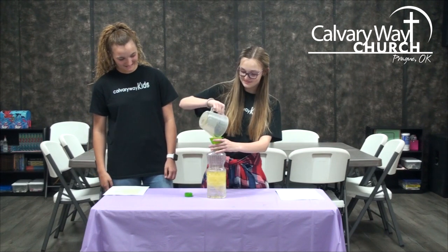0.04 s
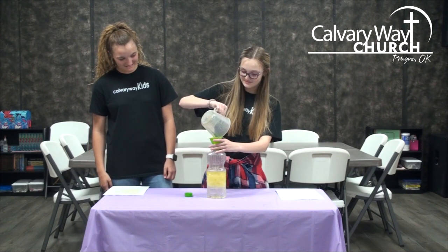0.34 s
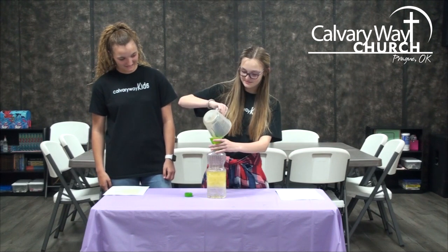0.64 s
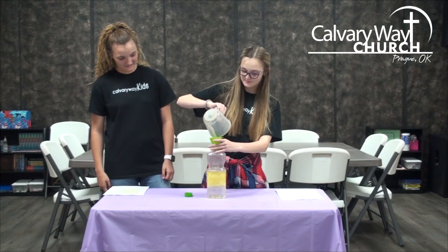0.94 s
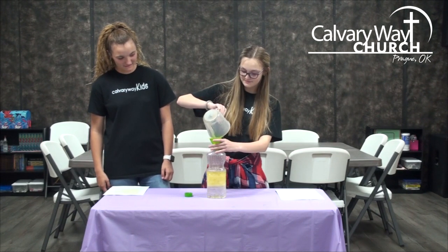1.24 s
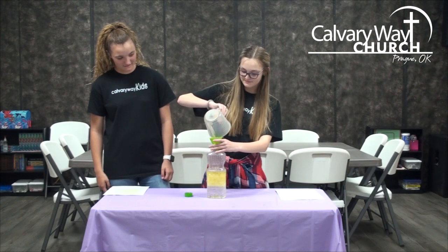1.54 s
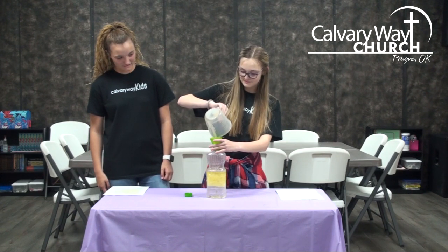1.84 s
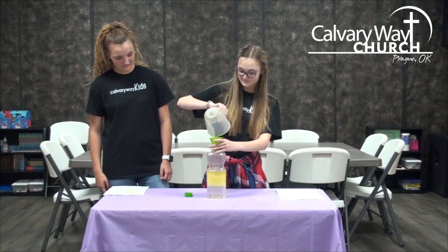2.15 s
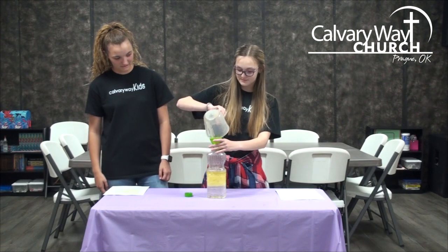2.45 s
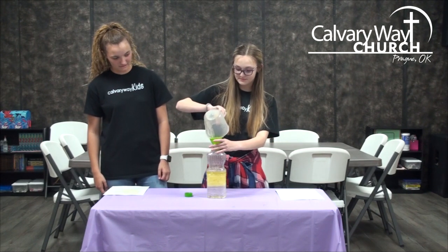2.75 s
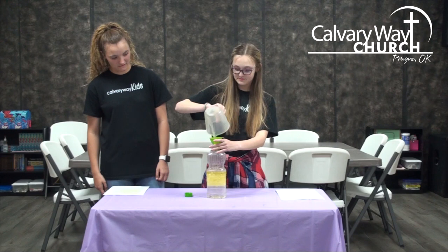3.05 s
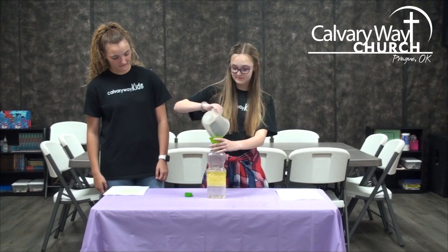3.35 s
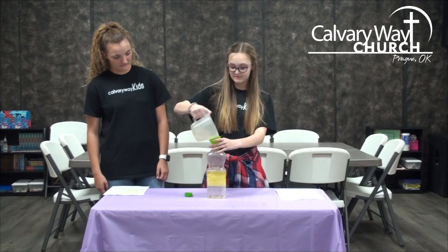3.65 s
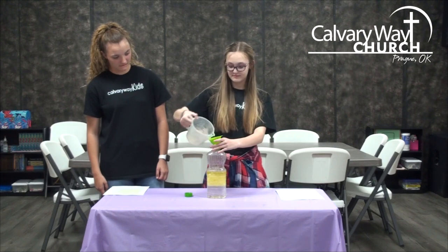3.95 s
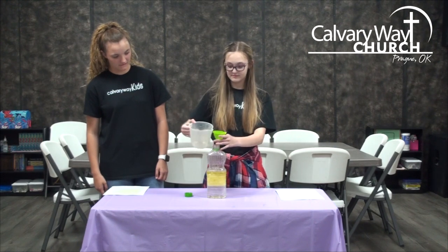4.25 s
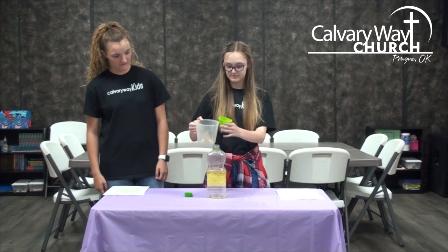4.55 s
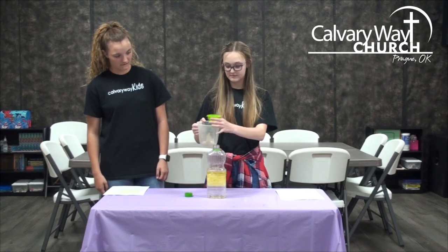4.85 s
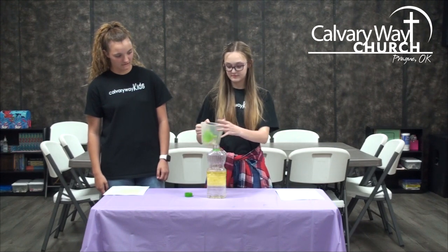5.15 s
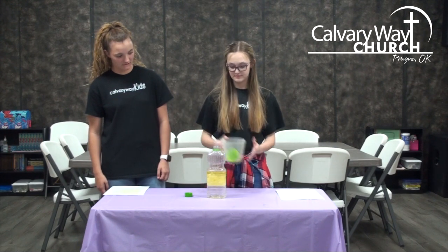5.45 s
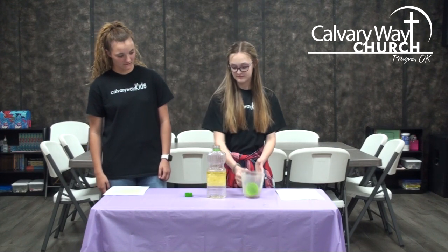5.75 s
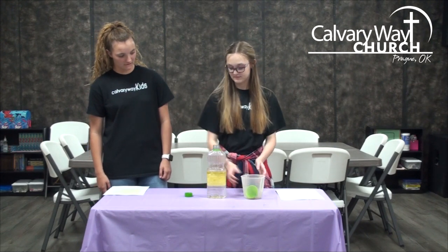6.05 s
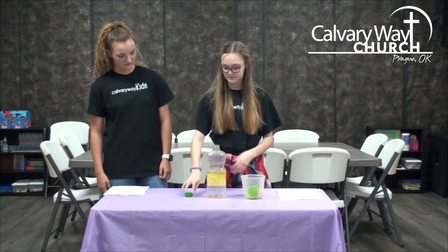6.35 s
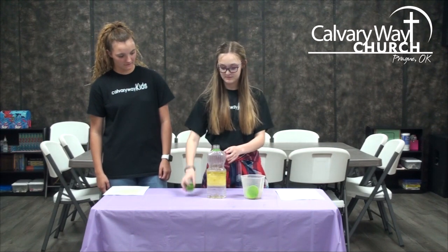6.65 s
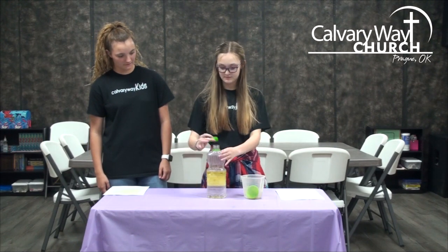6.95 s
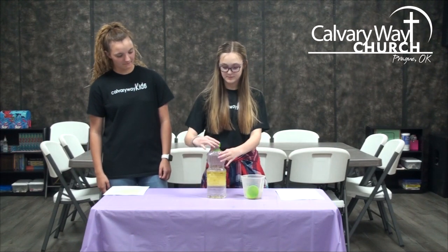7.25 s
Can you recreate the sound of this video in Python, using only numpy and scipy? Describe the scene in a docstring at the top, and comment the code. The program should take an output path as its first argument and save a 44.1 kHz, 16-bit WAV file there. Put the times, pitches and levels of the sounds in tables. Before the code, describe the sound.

Ventilation hisses steadily over a low rumble in a lively room that echoes each contact, with the action slightly to the left. From 0.2 to 1.2 seconds, five faint drips plop into a funnel. Between 1.3 and 3.3 seconds, a plastic jug knocks on the funnel nine times, about four a second, hollow clacks that grow louder and sharper with a soft table thud beneath. Light plastic bumps follow until 4.4 seconds. From 4.2 seconds a faint low drone, like a motor outside, climbs in pitch to the end. At 5.2 to 5.5 seconds the funnel bounces and clatters into the jug, its rim ringing briefly. Near 5.9 seconds the jug lands on the table with a dull, boomy thump and rocks briefly. Around 6.6 seconds fingers brush the plastic table cover amid small ticks, and at 7.2 seconds the cap clicks lightly onto the bottle.

```python
"""Emptying a plastic jug through a funnel

A jug drips into a funnel on a bottle and is knocked on it nine times to shake out the rest.
The funnel is lifted out and clatters into the jug, the jug thumps down on the table, and the cap
is fetched and put on the bottle. Most blows are a short click plus a few fading tones, and a lively
room echoes each one. Ventilation hisses throughout; a low drone climbs, like a motor outside."""
import sys
import numpy as np
from scipy import signal
from scipy.fft import rfft, irfft, next_fast_len
from scipy.io import wavfile
from scipy.ndimage import uniform_filter1d, map_coordinates

SR = 44100
rng = np.random.default_rng(int(sys.argv[2]) if len(sys.argv) > 2 else 0)


def unload_wav(signal):
    """Save mono or channel-first audio to the path in sys.argv[1] as 16-bit WAV at rate SR, clipped to [-1, 1]."""
    wavfile.write(
        sys.argv[1],
        SR,
        np.round(np.clip(np.atleast_2d(signal).T, -1, 1) * 32767).astype(np.int16),
    )


N = 325936
LENGTH = 27000  # samples in one blow with its tail

# A spectrum gives the relative strength of each frequency. A fade is the time to die away by 60 dB.
# spectrum of the ventilation: f/Hz, level/dB
AIR_SPECTRUM = [(15, -20), (25, 1), (40, -29), (55, 4), (80, -3.5), (148, -5.5), (179, -11.5), (570, -10),
                (857, -8), (1780, -14.5), (15800, -32.5)]
# how alike the ventilation is left and right: f/Hz, likeness (1 = the same)
AIR_LIKENESS = [(60, 1), (140, 0.85), (300, 0.044), (1000, 0.11), (5000, 0.063), (10000, 0.53)]
# drips into the funnel: t/s, level/dB, f/Hz
DRIPS = [(0.179, -35, 870), (0.425, -36, 910), (0.675, -34, 872), (0.807, -39, 993), (1.179, -35, 854)]
# knocks of the jug on the funnel: t/s, level/dB
KNOCKS = [(1.313, -15), (1.612, -13), (1.859, -11), (2.112, -9.5), (2.342, -8), (2.556, -8), (2.81, -3.5),
          (3.026, -10.5), (3.257, -4)]
# spectrum of the jug's shell: f/Hz, level/dB
SHELL_SPECTRUM = [(60, -49), (250, -20), (430, 3.5), (550, -6), (700, 10), (850, -4.5), (1050, 3.5),
                  (1400, -4), (1750, 4), (2250, -1.5), (2700, -4.5), (5000, -16.5), (10000, -29.5),
                  (16000, -73)]
# ringing tones of the shell: f/Hz, level/dB, fade/s
SHELL_TONES = [(473, -18, 0.3), (691.6, -6.5, 0.089), (1707, -16, 0.085), (1830, -12, 0.065),
               (2188, -4, 0.079), (2131, -8, 0.028)]
# thud of the table under the bottle: f/Hz, level/dB
THUD_SPECTRUM = [(30, -67), (62, -5), (85, -18), (110, -9.5), (150, 5.5), (210, 1), (300, -2.5), (450, -33),
                 (700, 2.5), (3000, -97)]
# crack of the jug's lip: f/Hz, level/dB
CRACK_SPECTRUM = [(300, -57), (1800, -21), (3000, -8), (4400, 6), (6500, 2), (10500, -7.5), (13000, -14.5),
                  (16000, -33.5)]
# snap of the funnel in the bottle's neck: f/Hz, level/dB
SNAP_SPECTRUM = [(1000, -37), (4000, 0), (7000, -14.5), (10800, 1.5), (13000, -48), (16000, -32),
                 (18000, -45)]
# light bumps of jug, funnel and cap: t/s, note level/dB, f/Hz, tick level/dB
BUMPS = [(3.324, -12, 636, -41), (3.365, -21, 690, -38.5), (3.638, -26.5, 444, -40.5),
         (3.738, -26.5, 885, -45), (3.835, -21, 694, -40.5), (3.892, -38, 680, -47.5),
         (4.021, -28, 944, -53), (4.211, -23.5, 930, -43.5), (4.352, -29.5, 855, -52),
         (6.486, -30, 643, -52), (6.722, -30.5, 1800, -45.5), (7.2, -27, 453, -39.5),
         (7.213, -52, 483, -37.5)]
# a bump's hollow note: multiple of its pitch, level/dB
NOTE_SPECTRUM = [(.2, -32), (.6, -16), (.85, -22), (1, 7.5), (1.15, -3), (1.6, -11.5), (5, -46.5)]
# a bump's tick: f/Hz, level/dB
TICK_SPECTRUM = [(40, -31), (200, 8.5), (500, 9), (1000, 8.5), (2000, 5.5), (3500, -6.5), (6000, -8),
                 (10000, -14.5), (15000, -36)]
# climb of the drone's lower tone: t/s, f/Hz
DRONE_PITCH = [(4.2, 49.5), (5.2, 54.8), (6.3, 58), (7.39, 60)]
# bounces of the funnel in the jug: t/s, level/dB, click level/dB
BOUNCES = [(5.1655, -15, -29), (5.234, -6.5, -23), (5.2455, -9, -27.5), (5.2869, -12, -24),
           (5.4256, -15.5, -27), (5.458, -22, -32), (5.4993, -28, -43), (5.5273, -16.5, -33)]
# spectrum of the hollow jug: f/Hz, level/dB
HOLLOW_SPECTRUM = [(60, -48), (200, -28.5), (330, -19.5), (450, -6), (640, 1.5), (800, -8), (1100, -18),
                   (1400, -12), (1900, -19), (2300, -11.5), (3300, -30.5), (8000, -57.5)]
# ringing tones of the hollow jug: f/Hz, level/dB, fade/s
HOLLOW_TONES = [(447, -14, 0.96), (526, -19, 0.3), (657, -28, 0.13)]
# ringing tones of the funnel's rim: f/Hz, level/dB, fade/s
RIM_TONES = [(1553, -0.5, 0.19), (1575, -2.5, 0.54), (1605, -6, 0.14), (1683, -8, 0.022), (1860, -19, 0.14),
             (2753, -18, 0.15)]
# click of the funnel's edge: f/Hz, level/dB
CLICK_SPECTRUM = [(900, -17.5), (2300, 12), (3700, -0.5), (5000, -1.5), (6500, -6.5), (8300, -4.5),
                  (11000, -11.5), (13000, -20), (16000, -27)]
# the jug lands on the table and rocks: t/s, level/dB
LANDINGS = [(5.931, -15.5), (5.950, -25), (5.982, -25.5), (6.006, -29.5), (6.058, -34.5)]
# boom of the table top: f/Hz, level/dB
TABLE_SPECTRUM = [(30, -23), (85, -21), (125, 1.5), (150, -0.5), (185, -7.5), (245, 6.5), (290, 4),
                  (330, -25), (600, -24.5), (2000, -80)]
# ringing tones of the table top: f/Hz, level/dB, fade/s
TABLE_TONES = [(143, -32, 0.19), (251, -21, 0.24), (285.2, -8.5, 0.22)]
# clack of the jug's base: f/Hz, level/dB
BASE_SPECTRUM = [(30, -40), (150, -24), (380, -3.5), (580, 3), (900, -12), (1500, -13), (3000, -23.5),
                 (6000, -29), (10000, -38), (15000, -57)]
# rub of fingers on the table cover: f/Hz, level/dB
COVER_SPECTRUM = [(1500, -20), (3200, -1), (8000, -5), (12000, -10), (16000, -13)]
# how long the room echoes: f/Hz, fade/s
ECHO_FADE = [(120, 0.58), (300, 0.89), (700, 0.57), (2000, 0.58), (5000, 0.61), (9000, 0.43), (15000, 0.24)]
# how alike the echo is left and right: f/Hz, likeness
ECHO_LIKENESS = [(60, 1), (250, 0.92), (600, 0.87), (1100, 0.72), (2200, 0.72), (5000, 0.83), (15000, 0.52)]
# direct sound compared with the echo: f/Hz, level/dB
DIRECT_OVER_ECHO = [(150, -37), (600, -7), (1200, -3.5), (2000, -2), (4000, -6.5), (10000, -2.5),
                    (15000, 9)]
# left side compared with the right: f/Hz, level/dB
LEFT_OVER_RIGHT = [(60, -2), (200, 1.5), (500, 2), (1200, 2), (2400, 2), (4400, 1.5), (8000, 1),
                   (15000, -1)]
# how far the left side's wave is ahead: f/Hz, phase/rad
LEFT_LEAD = [(50, 0.015), (150, 0.14), (600, 0.44), (1200, -0.22), (2200, -0.28), (4500, 0.24),
             (9000, 0.16)]


def amp(db):
    """Turn decibels into a factor to multiply by."""
    return 10 ** (np.asarray(db) / 20)


def unit(x):
    """Scale to an average power of 1."""
    return x / np.sqrt(np.mean(x ** 2) + 1e-20)


def blow_sized(x):
    """Scale to the energy of 50 ms at power 1."""
    return x * np.sqrt(SR / 20 / (np.sum(x ** 2) + 1e-20))


def look_up(table, hz):
    """Read between a table's rows, with frequency on a log scale."""
    freqs, values = np.transpose(table)
    return np.interp(np.log(hz + 1), np.log(freqs + 1), values)


def wobble(rate):
    """A smooth curve through `rate` random values a second."""
    return map_coordinates(rng.standard_normal(int(N * rate / SR) + 4), [np.arange(N) * rate / SR])


def filtered(x, response):
    """Multiply each frequency in x by response(hz)."""
    n = x.shape[-1]
    padded = next_fast_len(n + SR // 10)
    return irfft(rfft(x, padded) * response(np.fft.rfftfreq(padded, 1 / SR)), padded)[..., :n]


def flattened(x):
    """Even out the broad humps in the spectrum of a noise burst."""
    power = np.abs(uniform_filter1d(np.abs(rfft(x)) ** 2, size=64)) + 1e-20
    return filtered(x, lambda hz: np.interp(hz, np.fft.rfftfreq(len(x), 1 / SR), power ** -.5))


def pulse(spectrum):
    """A click with this spectrum that starts at once and dies away."""
    gains = amp(look_up(spectrum, np.fft.rfftfreq(LENGTH, 1 / SR)))
    cepstrum = irfft(np.log(gains))
    cepstrum[1:LENGTH // 2] *= 2  # folding onto the first half packs the energy at the start
    cepstrum[LENGTH // 2 + 1:] = 0
    return blow_sized(irfft(np.exp(rfft(cepstrum))))


def ring(tones, vary_db=0):
    """Tones that swell within a cycle or two, then fade; vary_db scatters their levels."""
    out, t = np.zeros(LENGTH), np.arange(LENGTH) / SR
    for hz, db, fade_s in tones:
        envelope = (1 - np.exp(-hz * t)) * np.exp(-np.log(1000) * t / fade_s)
        out += amp(db + vary_db * rng.normal()) * blow_sized(np.sin(2 * np.pi * hz * t) * envelope)
    return out


def chatter(x, width_s):
    """Plastic edges catch and slip: the blow is smeared in time but keeps its tone."""
    age = np.arange(LENGTH) / SR / width_s
    grip = age ** 2 * np.exp(-age ** 2 / 2)
    slips = rfft(rng.standard_normal(LENGTH) * grip)
    evened = slips / (np.abs(slips) + np.mean(np.abs(slips)) / 10)
    contact = irfft(evened) * np.sqrt(grip)
    return signal.fftconvolve(x, contact / np.linalg.norm(contact))[:LENGTH]


def spread(pair, likeness):
    """Blend two unrelated noises so that they seem to come from all around."""
    def shares(hz):
        angle = np.arccos(np.clip(look_up(likeness, hz), -1, 1)) / 2
        return np.array([np.cos(angle), np.sin(angle)])
    mid, side = filtered(pair, shares)
    return np.array([mid + side, mid - side])


def room_echo(build_s=0.0027):
    """The room's answer to a click: stereo noise whose treble dies first."""
    hz, t, noise = signal.stft(rng.standard_normal((2, LENGTH)), SR, nperseg=256)
    fade = np.exp(-np.log(1000) * t / look_up(ECHO_FADE, hz)[:, None])
    fading = signal.istft(noise * fade, SR)[1][:, :LENGTH]
    echo = spread(np.array([flattened(side) for side in fading]), ECHO_LIKENESS)
    echo *= 1 - np.exp(-(np.arange(LENGTH) / SR / build_s) ** 2)
    return echo / np.linalg.norm(echo.mean(0))


def in_room(x, echo, near_db):
    """Direct sound plus echo, a little to the left; more near_db sounds closer."""
    def direct(hz):
        return amp(look_up(DIRECT_OVER_ECHO, hz) + near_db)

    def placing(hz):
        sides = np.array([[0.5], [-0.5]])
        lean = amp(sides * look_up(LEFT_OVER_RIGHT, hz))
        lead = np.exp(1j * sides * look_up(LEFT_LEAD, hz))
        return lean * lead / np.hypot(1, direct(hz))  # equally loud near or far
    echoed = signal.fftconvolve(x[None], echo, axes=1)[:, :len(x)]
    return filtered(echoed + filtered(x, direct), placing)


def add(out, s, x):
    """Mix x into out, starting at s seconds."""
    start = max(round(s * SR), 0)
    out[:, start:start + x.shape[1]] += x[:, :N - start]


def ventilation(level_db=-46):
    """Moving air: a steady hiss over a low rumble."""
    noise = spread(rng.standard_normal((2, N)), AIR_LIKENESS)
    return amp(level_db) * unit(filtered(noise, lambda hz: amp(look_up(AIR_SPECTRUM, hz))))


def drips(fade_s=0.05):
    """The last liquid plops into the funnel: each plop is a bubble that rings briefly."""
    out, echo = np.zeros((2, N)), room_echo()
    for s, db, hz in DRIPS:
        plop = ring([(hz, db - 19, fade_s)], vary_db=2)
        add(out, s - .005, in_room(chatter(plop, width_s=0.0047), echo, near_db=8))
    return out


def jug_knocks(dull_hz=3000, full_crack_db=-10, thud_db_per_s=3.5):
    """The jug strikes the funnel; the push goes down through the bottle into the table."""
    out, hardest_db = np.zeros((2, N)), max(db for s, db in KNOCKS)
    thud, crack, snap = pulse(THUD_SPECTRUM), pulse(CRACK_SPECTRUM), pulse(SNAP_SPECTRUM)
    for s, db in KNOCKS:
        echo = room_echo()
        soft_db = hardest_db - db  # soft knocks are duller, ring less and blend into the room
        shell = pulse([(hz, level - 0.78 * soft_db * hz / (hz + dull_hz))
                       for hz, level in SHELL_SPECTRUM])
        bend = np.exp(0.0051 * rng.normal())  # the grip bends the shell's pitch
        ringing = ring([(hz * bend, level, fade_s) for hz, level, fade_s in SHELL_TONES])
        ringing *= amp(-3 - 0.42 * soft_db)
        crack_db = db - 1.73 * max(full_crack_db - db, 0)  # soft knocks lose their crack
        clack = amp(db - 14) * (shell + ringing) + amp(crack_db - 22) * crack
        thud_db = db - 25 + thud_db_per_s * (s - KNOCKS[0][0])  # the hand bears down ever more
        hit = chatter(clack, width_s=0.0036) + amp(thud_db) * thud
        add(out, s - .0028, in_room(hit, echo, near_db=1.5 - 0.21 * soft_db))
        neck = chatter(snap, width_s=0.00023) * amp(crack_db - 31)  # the funnel snaps into the neck
        add(out, s + .005, in_room(neck, echo, near_db=-1))
    return out


def bumps(fade_s=0.021):
    """Jug, funnel and cap bump lightly: each time a short hollow note and a tick."""
    out, tick = np.zeros((2, N)), pulse(TICK_SPECTRUM)
    for s, db, hz, tick_db in BUMPS:
        note = pulse(np.multiply(NOTE_SPECTRUM, [hz, 1])) + ring([(hz, -3, fade_s)], vary_db=0.5)
        hit = amp(db - 15) * note + amp(tick_db + 1) * tick
        add(out, s - .004, in_room(chatter(hit, width_s=0.0049), room_echo(), near_db=-2.5))
    return out


def drone(room_hz=54.17, room_width_hz=0.79, climb_hz_per_s=3.3, fade_in_s=0.47):
    """Two wavering tones climb; the lower swells as it passes a pitch at which the room rings."""
    def tone(hz, db):
        gain = np.sqrt(2) * amp(db + 2 * wobble(6))
        wavering_hz = hz + 0.34 * wobble(8)
        return gain * np.sin(2 * np.pi * np.cumsum(wavering_hz) / SR)
    t = np.arange(N) / SR
    since = t - DRONE_PITCH[0][0]
    low_hz = np.interp(t, *np.transpose(DRONE_PITCH))
    swell_db = 12 / (1 + ((low_hz - room_hz) / room_width_hz) ** 2)
    low = tone(low_hz, db=-50.5 + swell_db)
    high = tone(hz=147.8 + climb_hz_per_s * since, db=-54.5)
    return (low + high) * np.clip(since / fade_in_s, 0, 1)


def funnel_drop(tip_over_s=(5.3, 5.4)):
    """The funnel bounces on its spout in the hollow jug, then tips over and rings on its rim."""
    out, hollow, click = np.zeros((2, N)), pulse(HOLLOW_SPECTRUM), pulse(CLICK_SPECTRUM)
    for s, db, click_db in BOUNCES:
        body_db = db + np.interp(s, tip_over_s, (-8, -9.5))
        rim_db = db + np.interp(s, tip_over_s, (-31, -13))
        body = amp(body_db) * (hollow + ring(HOLLOW_TONES, vary_db=3.5))
        rim = amp(rim_db) * ring(RIM_TONES)
        hit = chatter(body + amp(click_db - 3.5) * click, width_s=0.00173) + rim
        add(out, s - .001, in_room(hit, room_echo(), near_db=0))
    return out * amp([[1.0], [-1.0]])  # further left


def jug_landing():
    """The jug's base clacks on the table and the hollow top booms; softer contacts clack less."""
    out, clack, boom = np.zeros((2, N)), pulse(BASE_SPECTRUM), pulse(TABLE_SPECTRUM)
    for s, db in LANDINGS:
        soft_db = LANDINGS[0][1] - db
        base = chatter(clack, width_s=0.0017) * amp(-8 - 0.13 * soft_db)
        hit = amp(db) * (boom + ring(TABLE_TONES, vary_db=2) + base)
        add(out, s, in_room(hit, room_echo(), near_db=-2.5))
    return out * amp([[1.5], [-1.5]])  # further left


def finger_swipe(peak_s=6.625, rise_s=0.023, fall_s=0.049):
    """Fingers brush the plastic table cover as they pick up the cap."""
    t = np.arange(N) / SR - peak_s
    stroke = np.exp(-(np.minimum(t, 0) / rise_s) ** 2 - np.maximum(t, 0) / fall_s)
    grain = amp(2 * wobble(250))
    hiss = filtered(rng.standard_normal(N), lambda hz: amp(look_up(COVER_SPECTRUM, hz)))
    return in_room(unit(hiss * grain) * stroke * amp(-43), room_echo(), near_db=2)


def scene():
    """Everything at the table, over the room's background."""
    at_table = drips() + jug_knocks() + funnel_drop() + jug_landing() + bumps() + finger_swipe()
    return at_table + drone() + ventilation()


def record(dry):
    """Cut off the very highest treble."""
    return filtered(dry, lambda hz: hz < 15900)


dry = scene()
out = record(dry)
unload_wav(out)
```